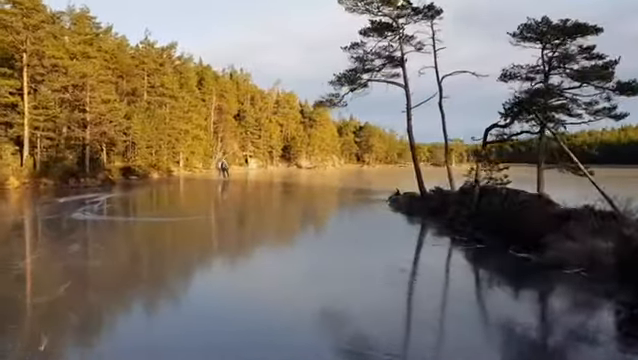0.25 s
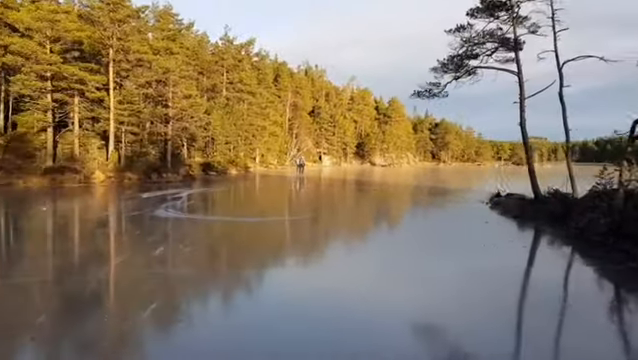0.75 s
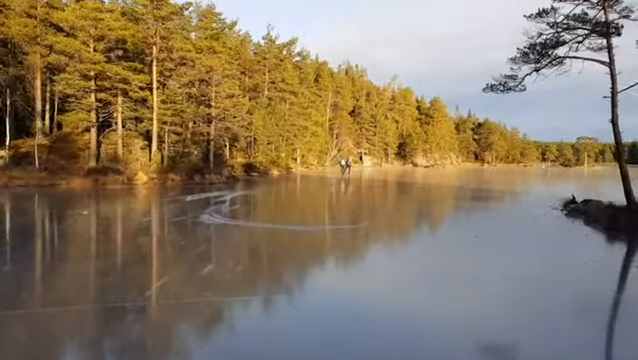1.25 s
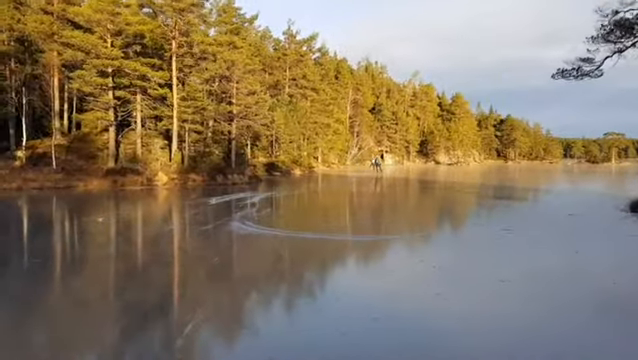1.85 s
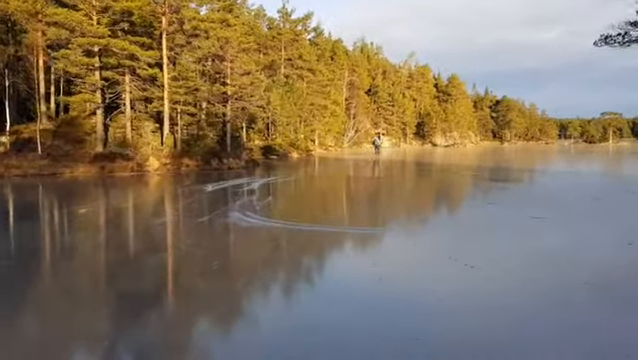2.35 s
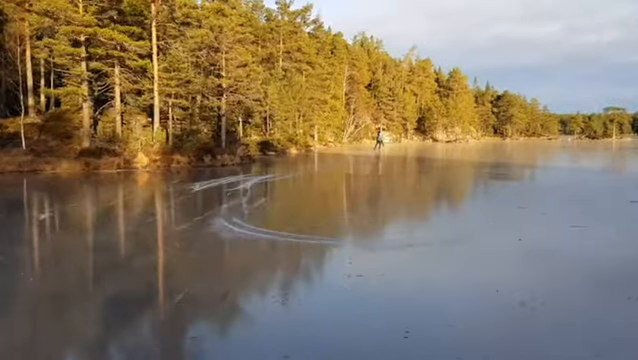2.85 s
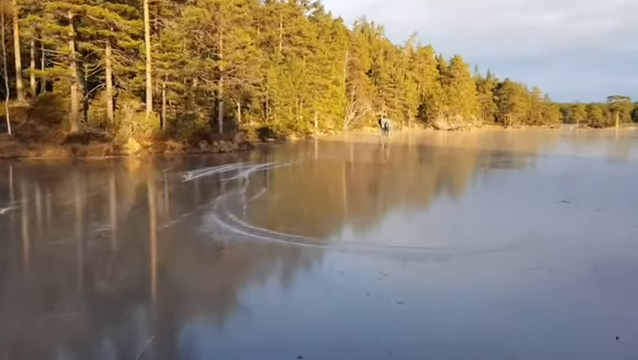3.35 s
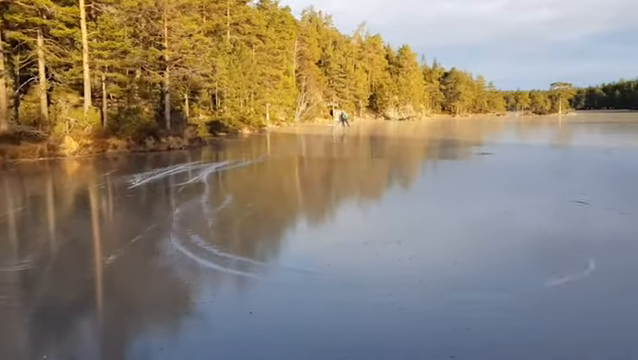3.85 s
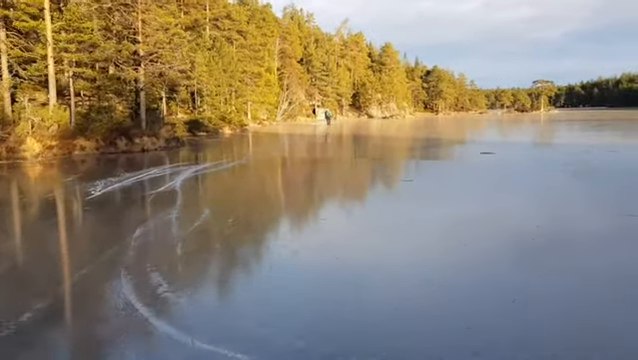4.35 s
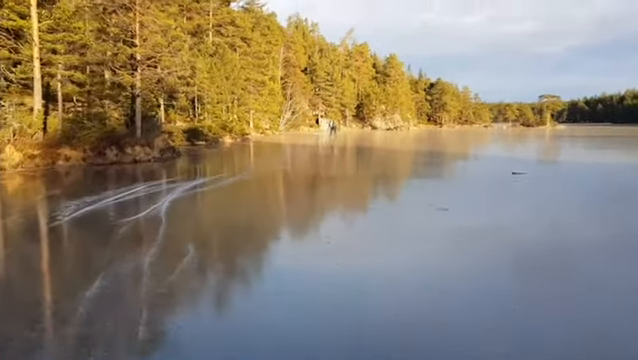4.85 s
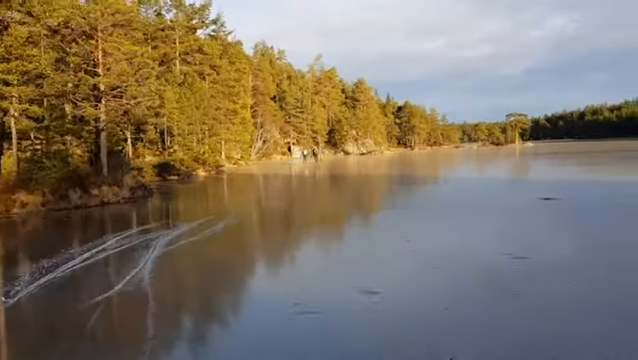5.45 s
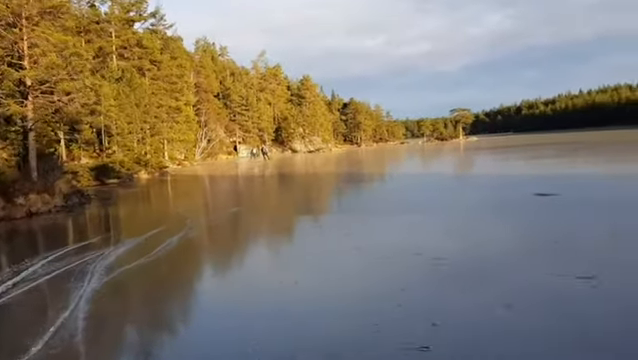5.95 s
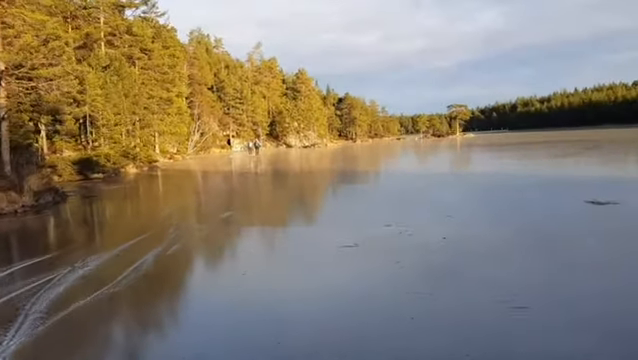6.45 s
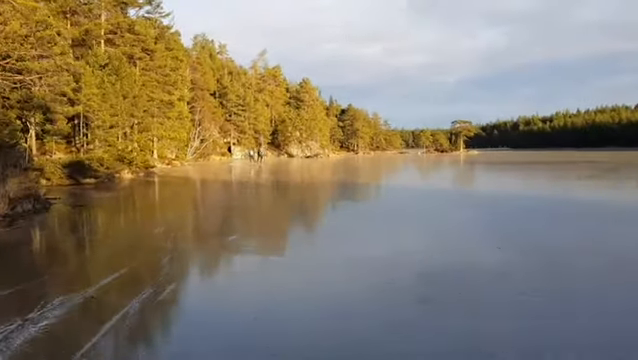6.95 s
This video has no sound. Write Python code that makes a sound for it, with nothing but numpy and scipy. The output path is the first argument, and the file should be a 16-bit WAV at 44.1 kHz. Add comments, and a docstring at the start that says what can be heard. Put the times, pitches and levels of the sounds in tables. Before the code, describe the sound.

A skater glides over thin lake ice in open air, heard from about a metre and a half above the blades. Quiet patchy steel hiss with tiny pitched flakes runs throughout, over low lumpy air rumble. In the first 0.3 s come dry gritty ticks, with a few soft low air thuds until 0.6 s. Hard ringing cracks cluster at 0.4-0.5 s, then smaller ones are scattered, a clearer one near 1.7 s. At about 2.05-2.1 s the strongest cracks snap with bright splinters. From 2.6 s blades bite in short stuttering rasps, stronger around 3.3-3.6 s and 4.0-4.4 s, with a sharp high crack at 4.3 s. Wind swells near 4.0-4.7 and 5.8-6.3 s. More scrapes and snaps follow at 5.1 s; cracks crowd from 5.8 s, mixing high snaps and lower knocks over faint low drumming, ending with strong cracks and rising wind at 7.1 s.

```python
"""A skater glides over thin lake ice: air rumbles at two microphone ports (lumpy low noise) from the start,
over the hiss of steel (patchy noise) with flakes (short pitched bursts). Dry ticks (bursts of grit) come early,
then a few thuds of air (fading low waves). From 0.4 s the sheet cracks (bursts of jumps that ring it and shed
splinters). From 2.6 s the blades bite in rough scrapes (stuttering noise). Later the sheet drums low
(bumps ringing its lowest mode). The microphone is about a metre and a half above the blades."""
import sys
import numpy as np
from scipy import signal
from scipy.io import wavfile
from scipy.ndimage import uniform_filter1d

SR = 44100
rng = np.random.default_rng(int(sys.argv[2]) if len(sys.argv) > 2 else 0)


def bounce(signal):
    """Save signal as a 16-bit WAV file at the path given by the first command-line argument."""
    frames = np.transpose(np.atleast_2d(signal))
    limited = np.clip(frames, -1, 1)
    pcm = np.round(limited * 32767).astype(np.int16)
    wavfile.write(sys.argv[1], SR, pcm)


N = 317079  # length in samples


def gain_of(db):
    """Turns a level in dB into an amplitude factor."""
    return 10 ** (np.asarray(db) / 20)


def evened(x):
    """Scales to an rms of 1."""
    return x / np.sqrt(np.mean(x ** 2) + 1e-20)


def peaked(x):
    """Scales to a peak of 1."""
    return x / (abs(x).max() + 1e-12)


def read(points, hz):
    """Reads a spectrum between its points, on a log-frequency axis."""
    f, value = np.transpose(points)
    return np.interp(np.log(hz + 1), np.log(f + 1), value)


def level_over_time(points):
    """Draws a line through (time_s, level_db) points and gives its gain at every sample."""
    return gain_of(np.interp(np.arange(N) / SR, *np.transpose(points)))


def high_pass(x, order, hz):
    """Takes away what lies below hz."""
    return signal.sosfilt(signal.butter(order, hz, "high", fs=SR, output="sos"), x)


def add(mix, s, sound):
    """Mixes a two-channel sound in at time s."""
    part = mix[:, round(s * SR):][:, :sound.shape[1]]
    part += sound[:, :part.shape[1]]


def ring(x, hz, width):
    """Lets x excite one damped resonance; the wider its band (Hz), the sooner it dies."""
    r = np.exp(-np.pi * width / SR)
    return signal.lfilter([1 - r, 0, r - 1], [1, -2 * r * np.cos(2 * np.pi * hz / SR), r * r], x)


def colour(points):
    """Makes filter taps that follow a dB spectrum and never sound ahead of their input."""
    log_gain = np.log(gain_of(read(points, abs(np.fft.fftfreq(1024, 1 / SR)))))
    spectrum = np.exp(signal.hilbert(log_gain).conj())
    return np.fft.ifft(spectrum).real[:256]


def wander(count, size):
    """Smooth random curve of rms 1 with bumps about `size` steps wide."""
    once = uniform_filter1d(rng.standard_normal(count), size)
    return evened(uniform_filter1d(once, size))


def noise(field, hz, same):
    """Two-channel noise shaped by magnitudes (bins x frames); `same` sets how alike the channels are."""
    a, b, c, d = rng.standard_normal((field.shape[1], len(hz), 4)).T
    same = np.clip(same, -1, 1)[:, None]
    left = a + 1j * b
    right = same * left + np.sqrt(1 - same ** 2) * (c + 1j * d)
    z = np.array([left, right]) * field
    window = 2 * len(hz) - 2
    sound = signal.istft(z, nperseg=window, noverlap=3 * (len(hz) - 1) // 2)[1]
    return evened(sound[:, :N])


# air stream at the ports: time_s, level_db
AIR_LEVEL = [(0, -43.5), (.6, -50), (.75, -56), (1.5, -62), (3.2, -61), (3.9, -58.5), (4.05, -47.5),
             (4.65, -49.5), (4.9, -60.5), (5.4, -56.5), (5.75, -46), (6.3, -47.5), (6.8, -56.5),
             (7.19, -38.5)]
# colour of the air rumble, only the shape counts: frequency_hz, level_db (per Hz)
AIR_COLOUR = [(20, -32), (70, -1.5), (150, -13), (260, -12), (700, -46)]


def air():
    """The passing air makes a lumpy low rumble, nearly unrelated at the two ports."""
    frames, hz = N // 128 + 9, np.fft.rfftfreq(512, 1 / SR)
    lumps_db = 3.44 * wander(frames, size=4) + 1.65 * wander(frames, size=16)
    field = gain_of(read(AIR_COLOUR, hz)[:, None] + lumps_db)
    rumble = noise(field, hz, np.full(len(hz), -.1))
    return level_over_time(AIR_LEVEL) * high_pass(rumble, 2, 28)


# colour of steel on ice, also used for the flakes, only the shape counts: frequency_hz, level_db (per Hz)
SCRAPE_COLOUR = [(200, -21.5), (321, 0), (888, -1.5), (1720, -2), (1980, 2.5), (2600, -2.5), (3300, -3.5),
                 (4300, -9.5), (5150, -9.5), (7470, -21.5), (10800, -18), (16000, -24.5)]
# how alike the scrape is at left and right: frequency_hz, likeness (1 = identical)
LIKENESS = [(60, 0.98), (300, 1), (700, 0.39), (3000, 0.26), (10000, 0.14)]


def steel(bright_db, band_hz, band_db, rough_db):
    """Steel on ice is a patchy, stuttering hiss; brightness and band are given for every sample."""
    frames, hz = N // 64 + 5, np.fft.rfftfreq(256, 1 / SR)
    at = np.minimum(np.arange(frames) * 64, N - 1)  # the sample at each frame
    patches = uniform_filter1d(rng.standard_normal((frames, len(hz))), 12, 0)
    patches = evened(uniform_filter1d(patches, 3, 1)).T
    octaves = np.log2(hz + 1)[:, None]
    treble_db = np.clip(octaves - np.log2(2500), 0, 1) * bright_db[at]  # full from 5 kHz up
    peak_db = band_db * np.exp(-((octaves - np.log2(band_hz[at])) / 0.084) ** 2)
    field = gain_of(treble_db + peak_db + read(SCRAPE_COLOUR, hz)[:, None])
    field = field / np.sqrt(np.mean(field ** 2, 0))  # the colour changes, its loudness stays
    stutter_db = rough_db * (wander(frames, size=3) + 1.5 * wander(frames, size=10))
    return noise(field * gain_of(3.5 * patches + stutter_db), hz, read(LIKENESS, hz))


def chips(typical_per_s):
    """Flakes break off in clumps; each crumbles for a few milliseconds around one of 20 pitches."""
    odds = typical_per_s / SR * np.exp(0.91 * wander(N, size=3000))
    size = gain_of(8.9 * np.minimum(rng.exponential(1, N), 3)) * (rng.random(N) < odds)
    pitches, t = np.geomspace(450, 5000, 20), np.arange(500) / SR
    pitch_number, out = rng.integers(0, 20, N), np.zeros((2, N))
    for k, f in enumerate(pitches):
        common, *own = rng.standard_normal((3, len(t))) * t * np.exp(-t / .0013)
        crumble = ring(common + .5 * np.array(own), f, 0.34 * f)
        crumble = crumble / np.linalg.norm(crumble)
        hits = size * (pitch_number == k)
        out += signal.oaconvolve(hits[None], crumble, axes=1)[:, :N]
    return evened(signal.lfilter(colour(SCRAPE_COLOUR), 1, out))


# ringing modes of the ice sheet, lowest first: frequency_hz, width_hz, level_db (the levels serve the cracks' #
# sheet only and are unused for the lowest mode; the scrapes and the drum also ring these modes)
ICE_MODES = [(326, 300, 12), (830, 180, 33), (1000, 220, 32), (1560, 290, 32), (2560, 220, -45),
             (4300, 360, -47), (5280, 480, -4)]


def rung(x):
    """The sheet's modes from the third up ring along with a scrape, all equally strong."""
    return evened(sum(evened(ring(x, f, w)) for f, w, _ in ICE_MODES[2:]))


# hiss of the gliding blades, before the ringing and flakes are added: time_s, level_db
BLADE_LEVEL = [(0, -51), (.6, -47.5), (1.2, -52.5), (1.55, -57), (1.75, -51.5), (2.05, -52), (2.28, -57),
               (2.4, -54.5), (2.8, -49.5), (3.25, -56.5), (3.45, -45.5), (3.75, -49.5), (4.45, -45),
               (5.03, -52.5), (5.35, -41.5), (5.55, -51), (6.5, -47), (7.19, -46.5)]
GLIDE_BRIGHT_DB, FLAKES_DB = 5.5, -3.5  # treble lift of the hiss; flakes against the hiss


def glide():
    """Running blades hiss quietly, make the sheet ring a little and break off flakes."""
    bright_db, band_hz = np.full(N, GLIDE_BRIGHT_DB), np.full(N, 1000.)
    hiss = steel(bright_db, band_hz, band_db=2.5, rough_db=1.)
    flakes = gain_of(FLAKES_DB) * chips(typical_per_s=220)
    return level_over_time(BLADE_LEVEL) * (hiss + 0.19 * rung(hiss) + flakes)


# dry bright ticks, peak level before the port balance: start_s, level_db
TICK_LIST = [(0.0317, -26), (0.0496, -25), (0.108, -28.5), (0.1406, -23), (0.2095, -23.5), (0.2388, -29),
             (0.259, -19.5), (0.297, -22), (1.2457, -31), (2.4908, -26.5), (2.9927, -31), (3.0235, -29),
             (4.554, -29.5), (5.4249, -26.5), (5.7617, -32), (6.8944, -29.5)]


def ticks():
    """Each tick is a quick burst of grit that rises and dies at once, with no body."""
    mix, t = np.zeros((2, N)), np.arange(200) / SR
    for s, db in TICK_LIST:
        common, *own = rng.standard_normal((3, len(t)))
        grit = (common + 2.0 * np.array(own)) * t * np.exp(-t / 0.00075)
        add(mix, s, gain_of(db) * peaked(grit))
    return mix


# puffs of air, each starting 2 * THUD_S ahead of its time: time_s, level_db (typical peak)
THUD_LIST = [(0.085, -36), (0.325, -44), (0.415, -38), (0.59, -35.5)]
THUD_HZ, THUD_S = 83.3, 0.0076  # typical pitch; time for the push to swell, then to die


def thuds():
    """A puff pushes slowly and lets go, at its own pitch and strength at each port."""
    mix, t = np.zeros((2, N)), np.arange(2000) / SR
    for s, db in THUD_LIST:
        chance = rng.standard_normal((2, 2))
        hz = THUD_HZ * np.exp(0.23 * chance[:, :1])
        push = t * np.exp(-t / THUD_S) * np.sin(2 * np.pi * hz * t)
        add(mix, s - 2 * THUD_S, gain_of(db + 2 * chance[:, 1:]) * peaked(push))
    return mix


# colour of the splinters, only the shape counts: frequency_hz, level_db
SPLINTER_COLOUR = [(1500, -21.5), (3500, 15), (5600, 7.5), (7600, -6), (10200, -5), (15500, -7)]
LEAD_S = .004  # from the first creak to the main break
CRUMBLE_S = 0.0016  # extra slowness of the onset of small cracks
CRACK_T60_S, T60_SPREAD = 0.041, .15  # typical time for the jumps to fade by 60 dB; its random spread
BREAK, BREAK_FULL_DB, BREAK_RANGE_DB = 6.7, -12.5, 33  # strength of the one big blow; level scale of its size
THUMP_CREST_DB, SPLINTER_CREST_DB = 5.5, 11.5  # from the listed level to the peak


def crack(db, hz, thump_db, splinter_db, chance):
    """A fracture runs in jumps that snap at one pitch, flex the sheet and shed splinters."""
    t = np.arange(chance.shape[1]) / SR - LEAD_S
    t60 = CRACK_T60_S * np.exp(T60_SPREAD * chance[1, 0])
    fade = gain_of(-60 * np.maximum(t, 0) / t60)
    size = np.clip(1.5 + (db - BREAK_FULL_DB) / BREAK_RANGE_DB, .1, 1)
    jumps = 0.15 * chance[0] ** 3 + .5 * chance[1:3]  # spiky common run, finer grit differs per port
    onset = np.exp(np.minimum(t, 0) / (0.00069 + CRUMBLE_S * (1 - size)))  # swells up to the main break
    jumps = jumps * fade * onset
    jumps[:, round(LEAD_S * SR)] += BREAK * size ** 2  # big cracks break at one blow, small ones crumble
    run = jumps.mean(0) + 0.73 * (jumps - jumps.mean(0))  # makes the ports more alike
    width = hz * (0.1 + 0.4 * size)  # a big break dies quickly, a small one rings a little
    snap = peaked(ring(ring(run * fade, hz, width), hz, 1.23 * hz))
    sheet = peaked(sum(gain_of(g) * ring(run, f, w) for f, w, g in ICE_MODES[1:]))
    low_hz, low_width, _ = ICE_MODES[0]
    thump = ring(run, low_hz, low_width)
    thump = peaked(ring(ring(thump, low_hz, 610), low_hz, 670))
    splinters = peaked(signal.lfilter(colour(SPLINTER_COLOUR), 1, jumps * fade ** 0.34))
    sound = gain_of(db) * (snap + 0.42 * sheet)
    sound = sound + gain_of(thump_db + THUMP_CREST_DB) * thump
    sound = sound + gain_of(splinter_db + SPLINTER_CREST_DB) * splinters
    # samples the left port lags, by the direction of the crack
    lag = int(np.clip(np.round(2.8 + 0.66 * chance[0, 0]), -2, 4))
    return np.array([np.roll(sound[0], lag), sound[1]])


# cracks of the sheet, before the port balance: time_s (1.8 ms ahead of the main break),
# snap_db (peak), pitch_hz (of the snap), thump_db (nominal rms), splinters_db (nominal rms)
CRACK_LIST = [(0.401, -15.5, 800, -37.5, -25.5), (0.451, -12.5, 690, -27, -28.5),
              (0.482, -5, 1190, -24.5, -24), (0.641, -30, 1710, -58, -54), (0.682, -27.5, 2040, -63, -47),
              (0.714, -28.5, 1330, -71, -41), (0.742, -25, 990, -60, -29.5), (0.98, -29.5, 1010, -58, -45),
              (1.0248, -31, 950, -62, -63), (1.041, -20.5, 1040, -51, -29.5), (1.066, -30, 980, -70, -52),
              (1.122, -32, 890, -47, -43), (1.424, -29, 1790, -55, -42), (1.67, -19.5, 1760, -45.5, -32.5),
              (1.814, -33.5, 1110, -74, -37.5), (1.861, -39, 970, -70, -46),
              (2.042, -2, 1260, -27.5, -16.5), (2.08, -13.5, 670, -21, -40), (2.091, -3, 1640, -30, -18),
              (2.137, -22, 1090, -47, -36.5), (2.337, -31.5, 1100, -42, -39),
              (2.438, -35, 3230, -55, -34.5), (2.9, -17, 2080, -72, -29.5),
              (3.116, -14.5, 2360, -35.5, -34), (3.183, -32, 3400, -38, -43), (3.315, -21, 3200, -68, -33),
              (3.3277, -15, 1920, -45, -37), (3.433, -27, 2940, -41.5, -49), (3.459, -31, 1000, -42, -55),
              (3.581, -28.5, 810, -37.5, -49), (3.837, -39, 3530, -70, -32),
              (3.88, -22.5, 1740, -72, -35.5), (3.909, -28, 1840, -42, -35), (4.045, -18, 1800, -32, -50),
              (4.062, -27, 1750, -33, -26), (4.111, -18, 1630, -35, -61), (4.156, -15, 1750, -47, -38),
              (4.245, -21, 2000, -45, -33), (4.283, -8, 2350, -42, -15.5), (4.347, -22, 1760, -33.5, -31),
              (4.816, -24.5, 1750, -39.5, -36), (5.0952, -16, 1890, -46, -24), (5.108, -30, 2500, -39, -37),
              (5.115, -21, 1010, -34, -40), (5.148, -13, 2100, -58, -40), (5.294, -27, 845, -40.5, -27),
              (5.39, -37, 2080, -68, -39), (5.613, -23, 1870, -67, -40), (5.656, -25, 2120, -59, -58),
              (5.846, -13.5, 2600, -44, -40), (5.901, -23, 2120, -38.5, -34.5), (6.161, -9, 2100, -36, -42),
              (6.19, -17.5, 1940, -31, -49), (6.227, -18, 910, -31, -33), (6.266, -24, 890, -39, -35),
              (6.305, -23, 2340, -34.5, -53), (6.333, -24, 1060, -33.5, -33.5),
              (6.362, -23, 800, -37.5, -37), (6.398, -22, 1040, -33.5, -37), (6.434, -10, 1440, -25.5, -25),
              (6.619, -23, 1990, -53, -39), (6.684, -30, 982, -39, -48), (6.931, -18, 990, -34, -24.5),
              (6.956, -20, 1300, -42, -42), (7.0146, -16.5, 1170, -27, -34), (7.023, -18, 1290, -45, -45),
              (7.069, -22, 1020, -34.5, -33), (7.122, -9, 2170, -29.5, -28)]


def cracks():
    """The sheet breaks under the load, one fracture at each listed moment."""
    mix = np.zeros((2, N))
    for s, *row in CRACK_LIST:
        chance = rng.standard_normal((3, 3000))
        add(mix, s - .0022, crack(*row, chance))
    return mix


def slips(per_s, decay_s):
    """A sticking and slipping contact catches suddenly; uneven catches die away, with rms 1 overall."""
    sizes = gain_of(2.7 * np.minimum(rng.exponential(1, N), 3))
    catches = sizes * (rng.random(N) < per_s / SR)
    keep = np.exp(-1 / (decay_s * SR))
    return evened(signal.lfilter([1], [1, -keep], uniform_filter1d(catches, size=20)))


# an edge bites and shaves the ice, level before the chatter and port balance:
# start_s, length_s, level_db (at the start), change_db (by the end), band_hz (strongest band)
BITE_LIST = [(2.593, 0.079, -52.5, 8, 4300), (2.855, 0.076, -38.5, -11, 2140),
             (3.328, 0.082, -28.5, -11.5, 4300), (3.487, 0.13, -32, -9, 5630),
             (3.975, 0.18, -34.5, 1.5, 1735), (4.283, 0.079, -22.5, -15.5, 2580),
             (4.452, 0.038, -37, -1, 1220), (4.664, 0.019, -34, -1, 3050), (5.099, 0.048, -24, -1, 2290),
             (5.158, 0.025, -32, -8, 4300), (5.23, 0.044, -33.5, -3, 1510), (5.265, 0.035, -37, -7, 5200),
             (5.31, 0.014, -34.5, 1, 5200), (5.985, 0.0083, -27.5, -4.5, 2800),
             (6.103, 0.013, -36, 3.5, 2030), (6.166, 0.014, -30.5, -3, 2410), (6.357, 0.049, -36, 1, 1200),
             (6.707, 0.024, -43.5, 6, 2630), (6.934, 0.013, -18, -7.5, 2280),
             (7.036, 0.14, -34.5, -7, 2230), (7.118, 0.031, -35, -8, 4570)]
BITE_BRIGHT_DB, BRIGHT_DB_PER_OCTAVE = -4, 7.5  # treble lift at a 2 kHz band; higher bands are brighter
CATCHES_PER_S, CATCH_S, CHATTER = 220, .003, .4  # stick-slip: rate, decay and depth


def bites():
    """A biting edge rasps in short stuttering scrapes that start at once and stop when it lets go."""
    t = np.arange(N) / SR
    level, band_hz = np.zeros(N), np.full(N, 2000.)
    for start, length, db, change_db, hz in BITE_LIST:
        attack = np.clip((t - start) / .002, 0, 1)
        release = np.exp(-np.maximum(t - start - length, 0) / .006)
        progress = np.clip((t - start) / length, 0, 1)
        level += gain_of(db + change_db * progress) * attack * release
        band_hz[t > start - .01] = hz  # each bite sets the band just before it starts
    level *= 1.2 - CHATTER + CHATTER * slips(CATCHES_PER_S, CATCH_S)
    bright_db = BITE_BRIGHT_DB + BRIGHT_DB_PER_OCTAVE * np.log2(band_hz / 2000)
    rasp = steel(bright_db, band_hz, band_db=8.0, rough_db=-0.7)
    rasp = evened(rasp + 0.42 * rung(rasp))
    return level * high_pass(rasp, 1, 600)  # shaving has little body


# low drumming of the sheet, before the port balance: time_s, level_db
DRUM_LEVEL = [(0, -81), (2.5, -75), (4.5, -52.5), (5.5, -57.5), (5.75, -53.5), (7.19, -45)]


def drum():
    """Small bumps of the surface shake the sheet's lowest mode in lumps, the same wave for both ports."""
    hz, width, _ = ICE_MODES[0]
    bumps = rng.standard_normal(N) * gain_of(5.76 * wander(N, size=500))
    return level_over_time(DRUM_LEVEL) * evened(ring(ring(bumps, hz, width), hz, width))


def scene():
    """The ice lies nearer the right port: louder there, and the scrapes reach it a little earlier."""
    left, right = high_pass(glide() + bites(), 4, 300)
    ice = ticks() + cracks() + drum() + [np.roll(left, 1), right]
    port_balance = gain_of([[-.9], [.9]])
    return ice * port_balance + air() + thuds()


HISS_DB, EDGE_HZ = -61.5, 15800  # microphone self-noise before the band limit; upper edge of the band


def record(dry):
    """The microphone adds self-noise, rounds off the loudest peaks and cuts the highest treble."""
    heard = dry + gain_of(HISS_DB) * rng.standard_normal(dry.shape)
    loaded = 1.3 * np.tanh(heard / 1.3)
    band_limit = signal.firwin(511, EDGE_HZ, window=("kaiser", 9), fs=SR)
    return signal.oaconvolve(loaded, band_limit[None], "same")


dry = scene()
out = record(dry)
bounce(out)
```